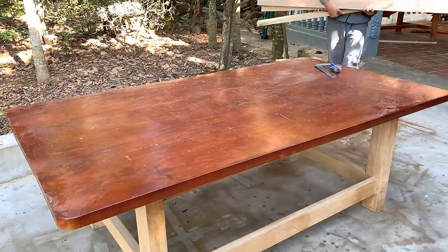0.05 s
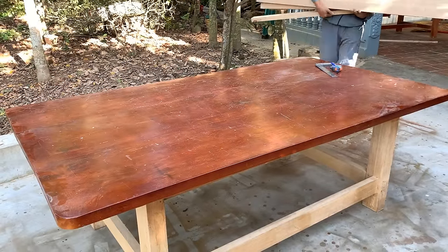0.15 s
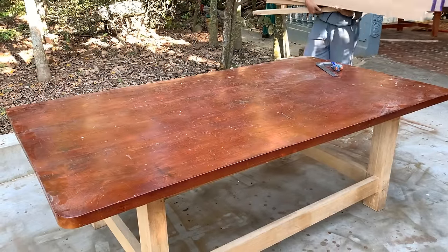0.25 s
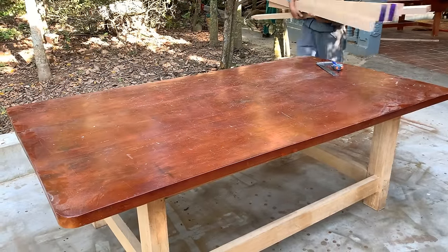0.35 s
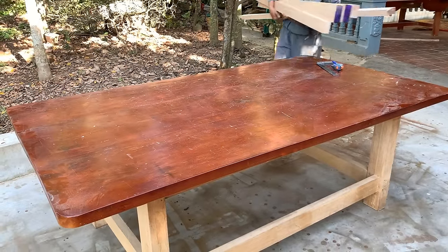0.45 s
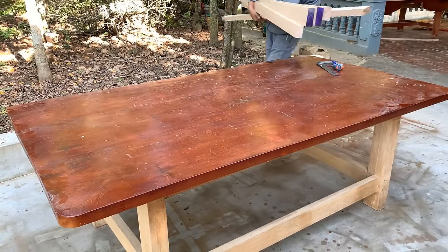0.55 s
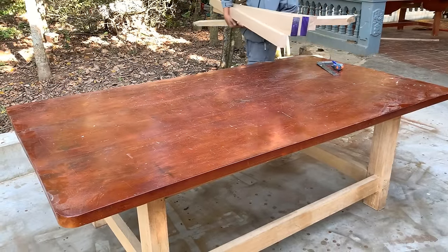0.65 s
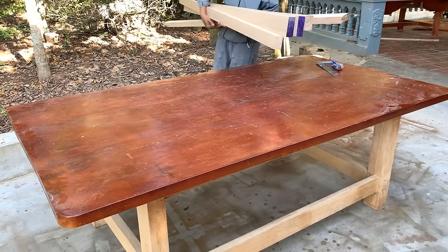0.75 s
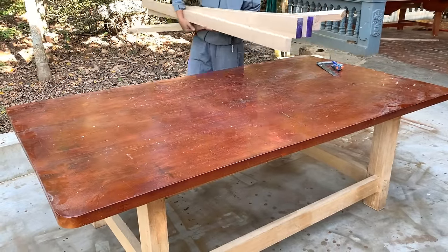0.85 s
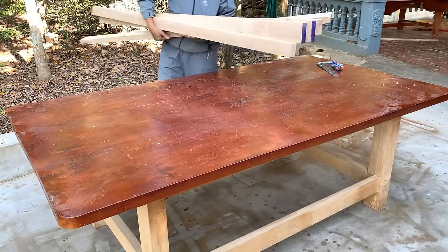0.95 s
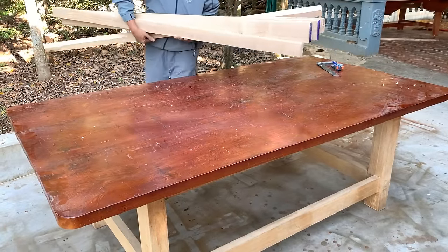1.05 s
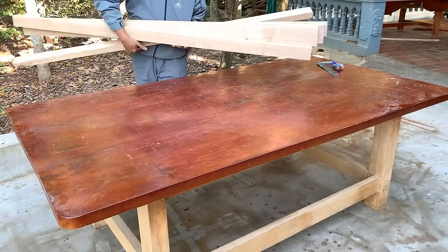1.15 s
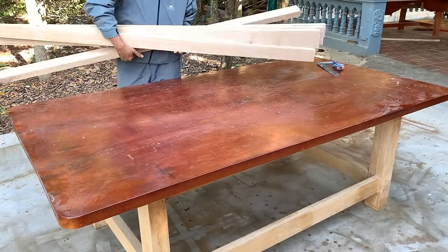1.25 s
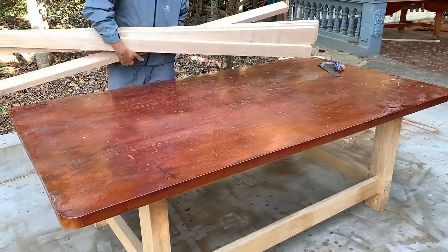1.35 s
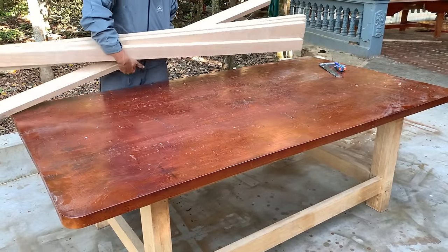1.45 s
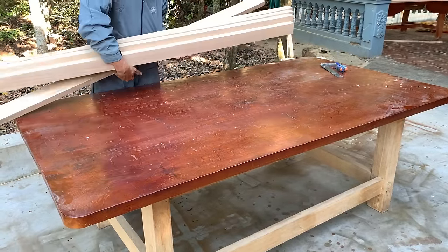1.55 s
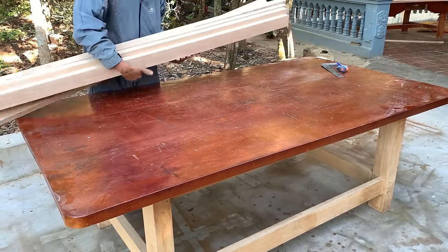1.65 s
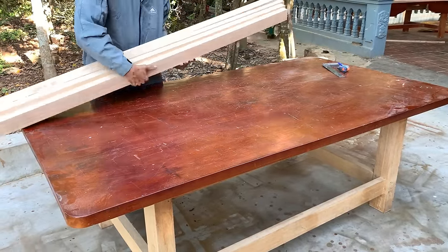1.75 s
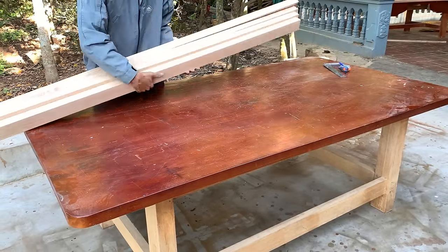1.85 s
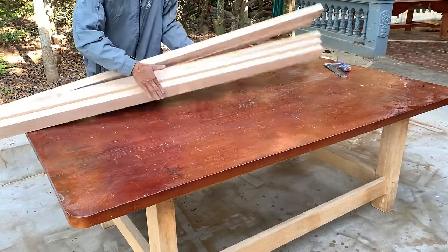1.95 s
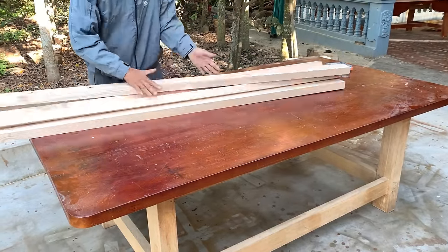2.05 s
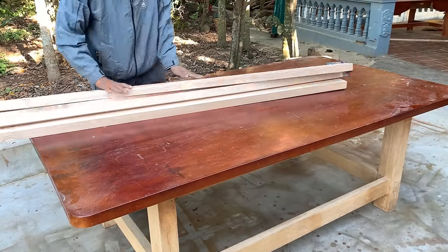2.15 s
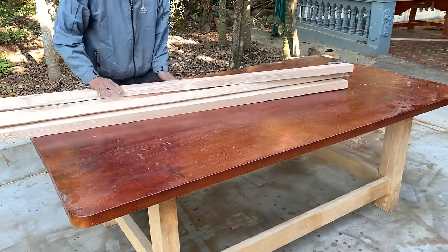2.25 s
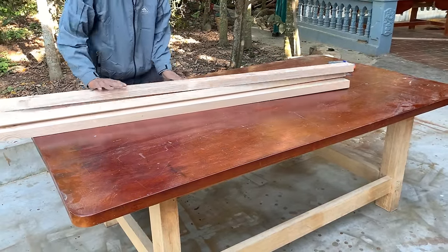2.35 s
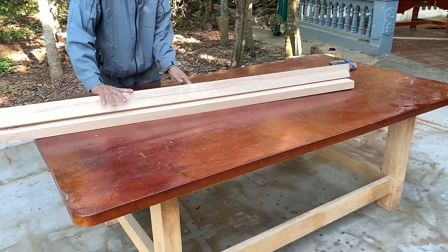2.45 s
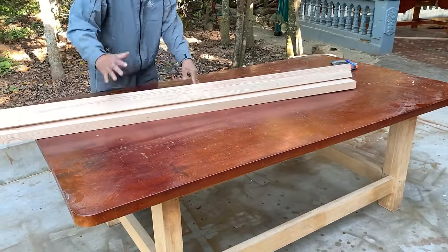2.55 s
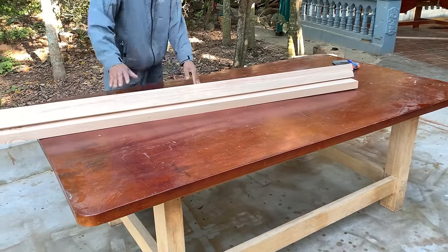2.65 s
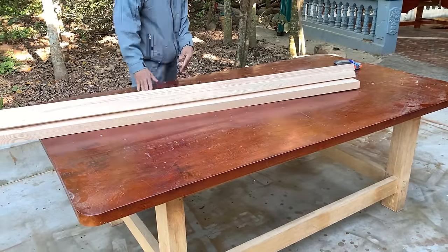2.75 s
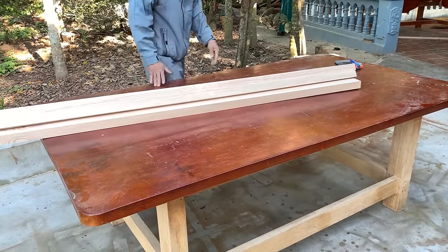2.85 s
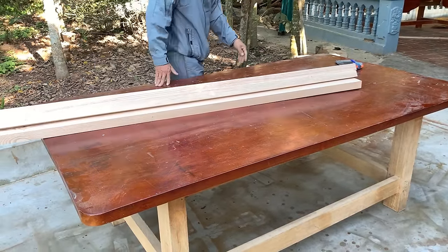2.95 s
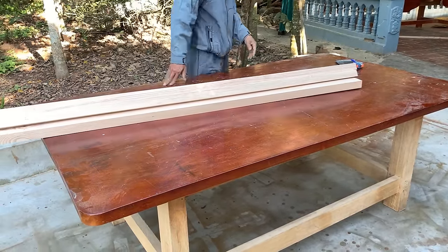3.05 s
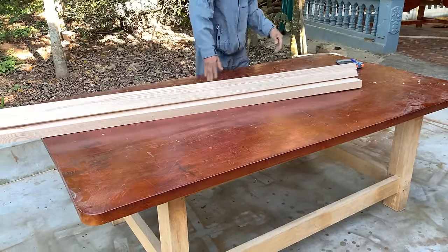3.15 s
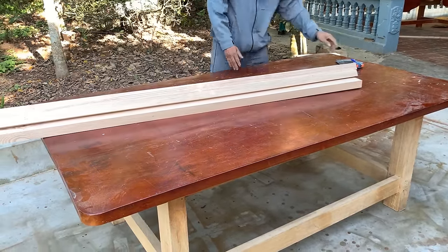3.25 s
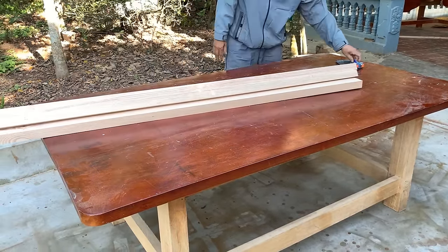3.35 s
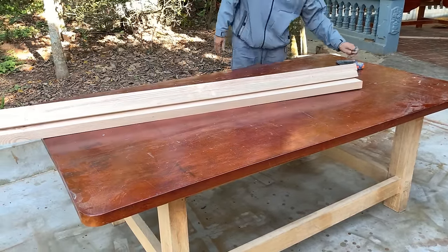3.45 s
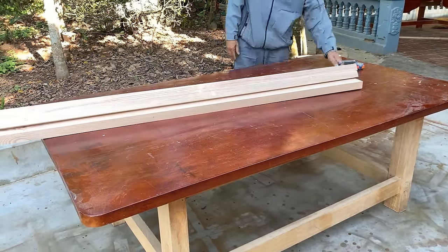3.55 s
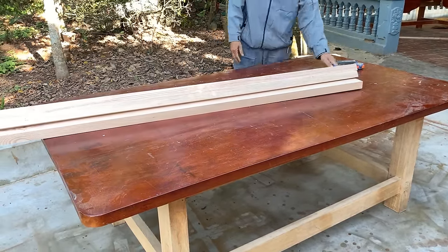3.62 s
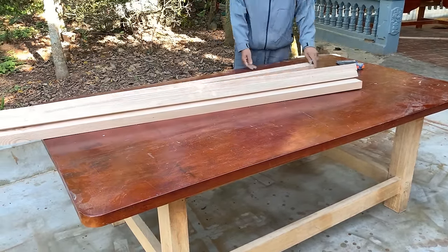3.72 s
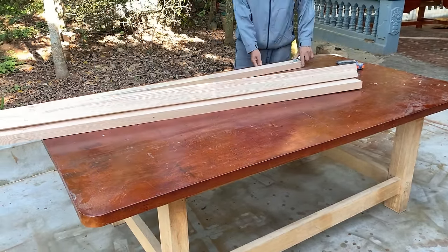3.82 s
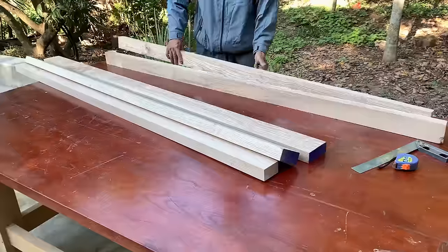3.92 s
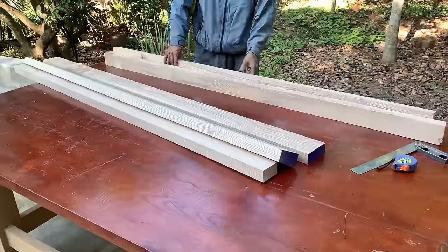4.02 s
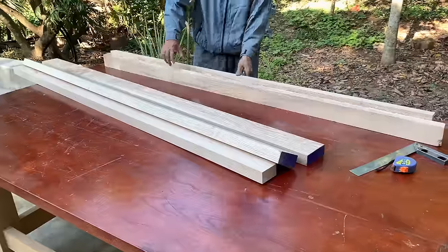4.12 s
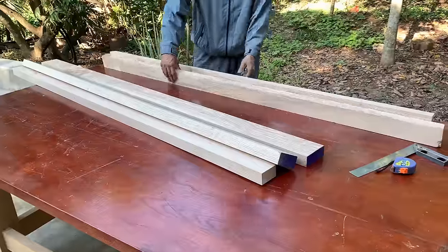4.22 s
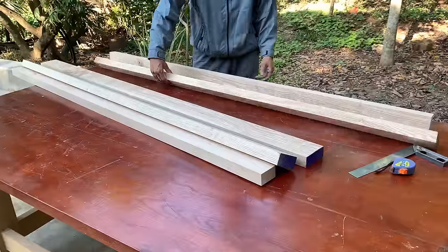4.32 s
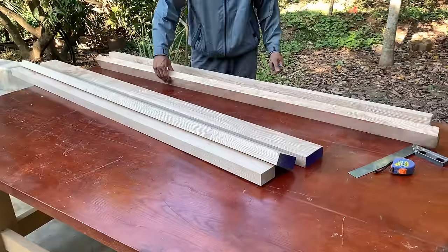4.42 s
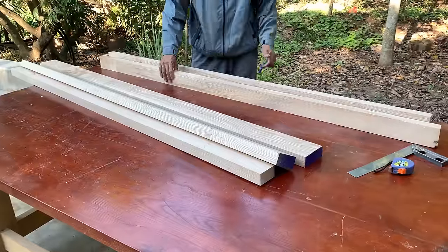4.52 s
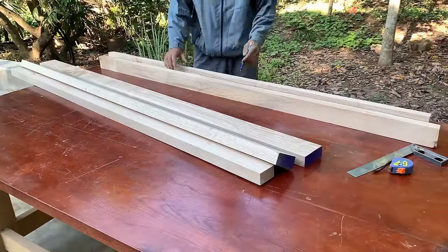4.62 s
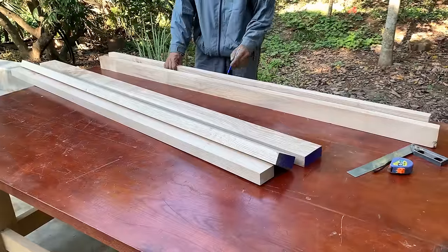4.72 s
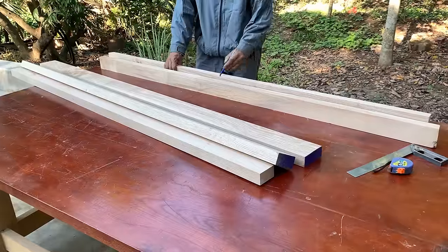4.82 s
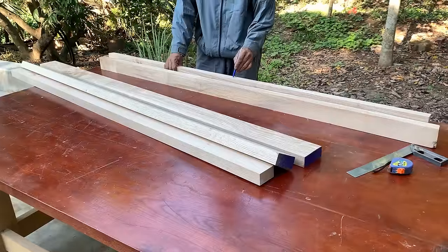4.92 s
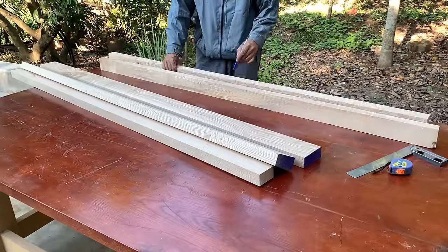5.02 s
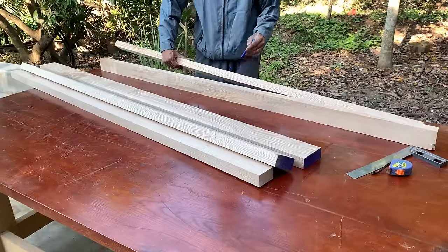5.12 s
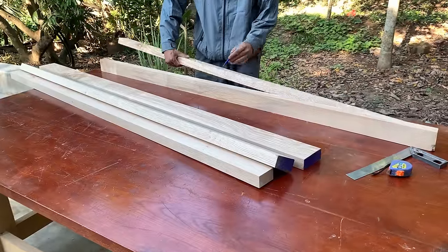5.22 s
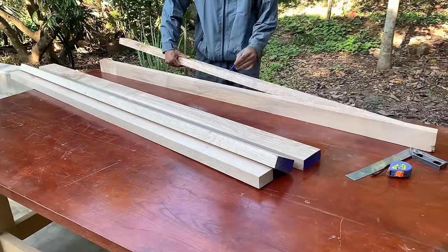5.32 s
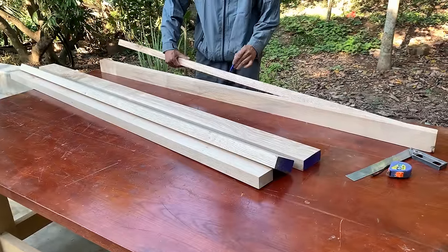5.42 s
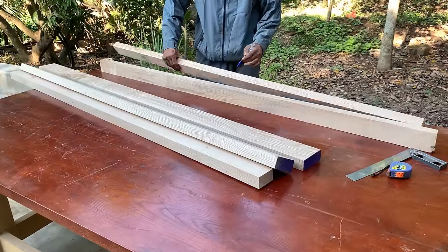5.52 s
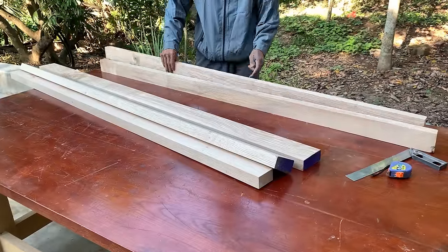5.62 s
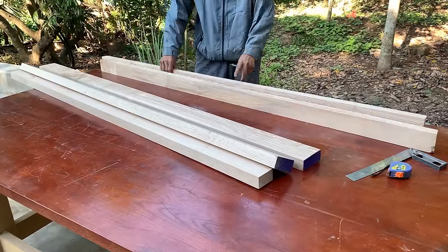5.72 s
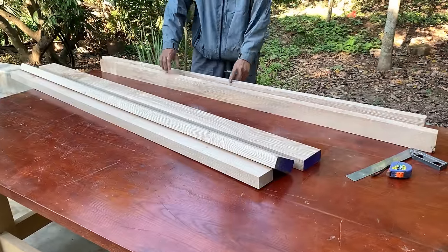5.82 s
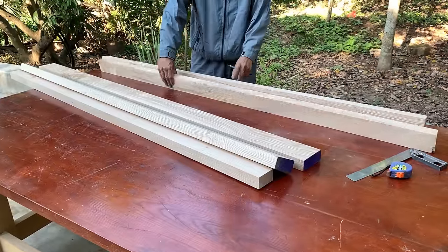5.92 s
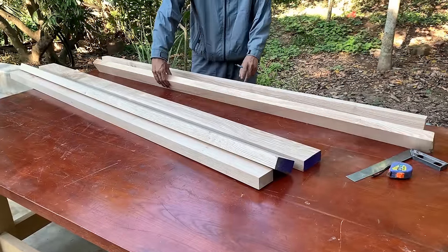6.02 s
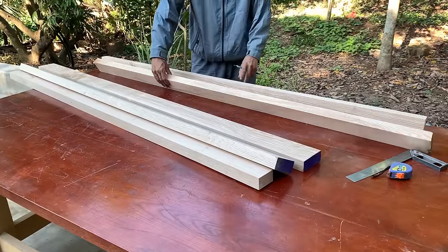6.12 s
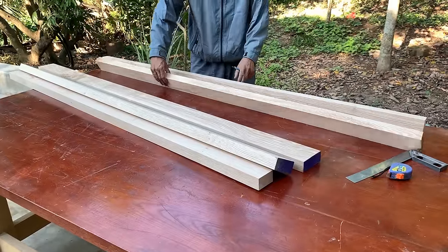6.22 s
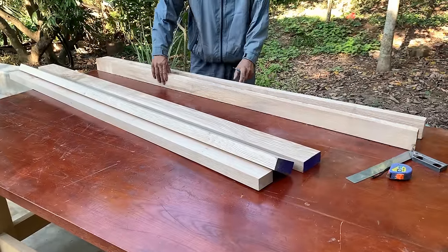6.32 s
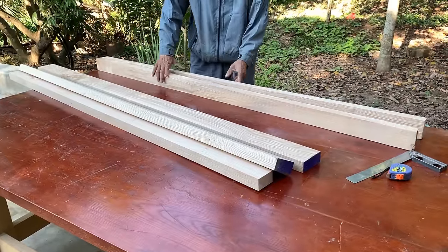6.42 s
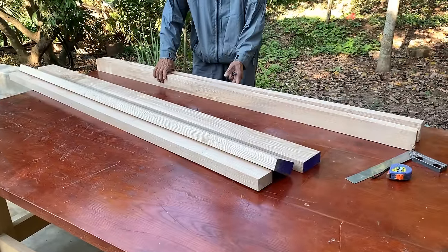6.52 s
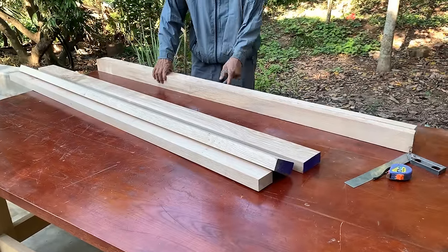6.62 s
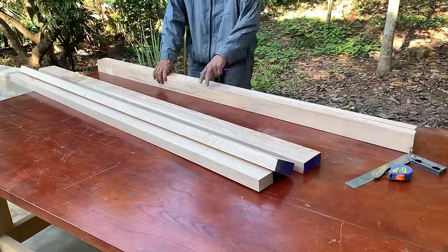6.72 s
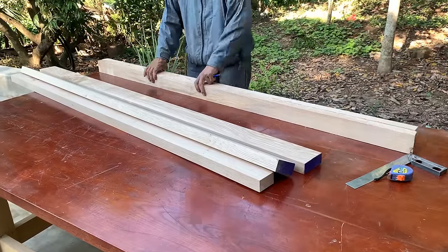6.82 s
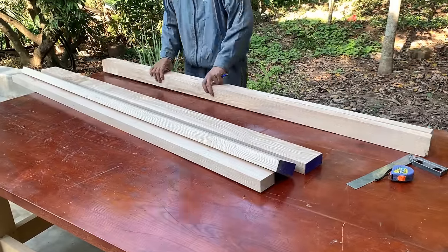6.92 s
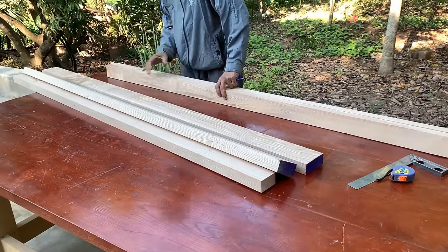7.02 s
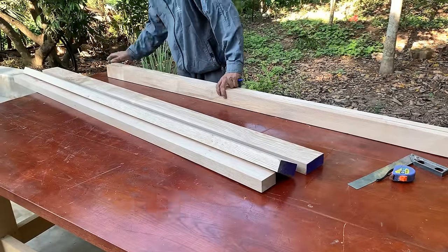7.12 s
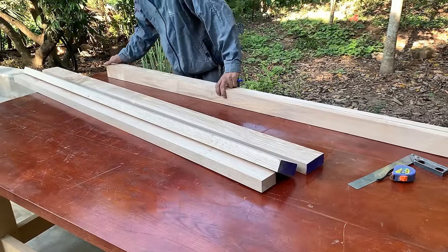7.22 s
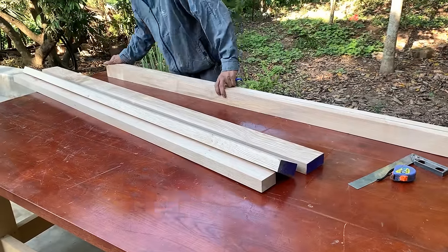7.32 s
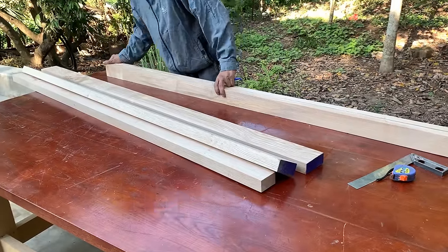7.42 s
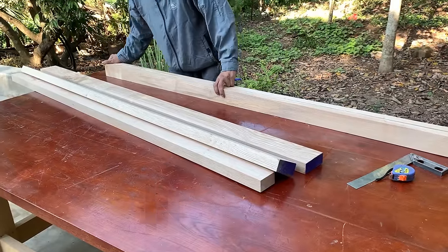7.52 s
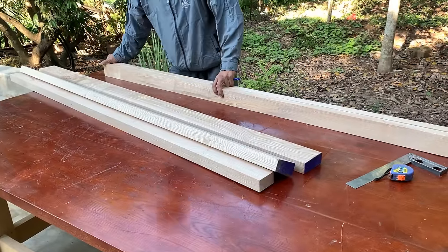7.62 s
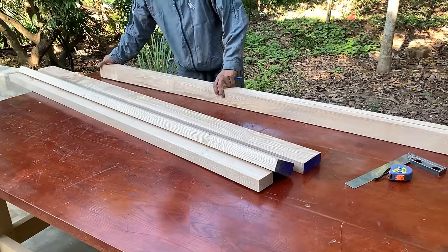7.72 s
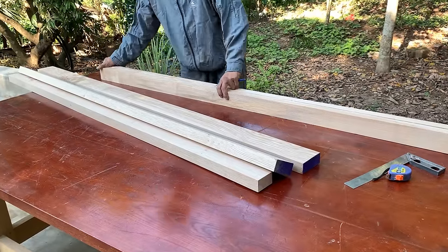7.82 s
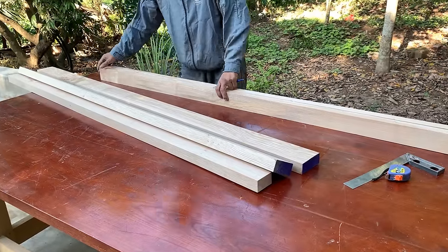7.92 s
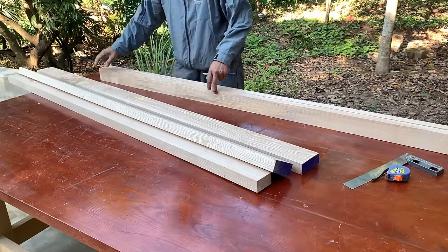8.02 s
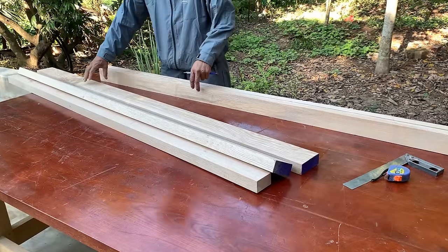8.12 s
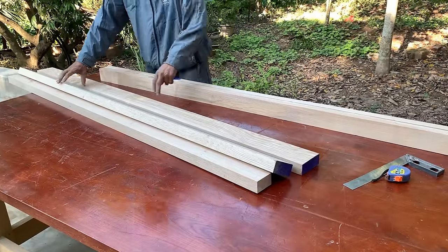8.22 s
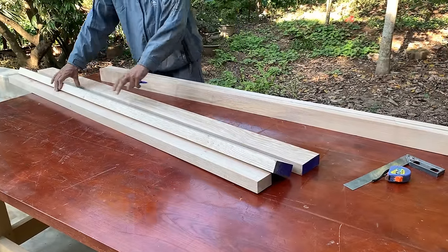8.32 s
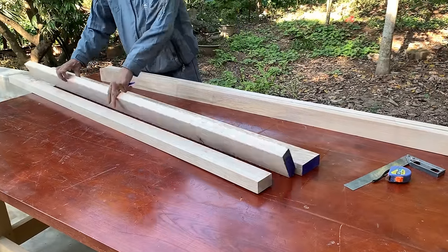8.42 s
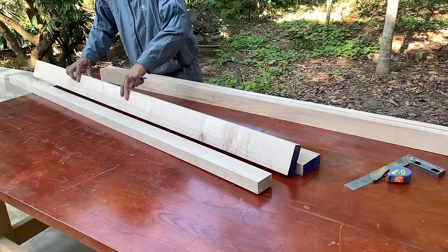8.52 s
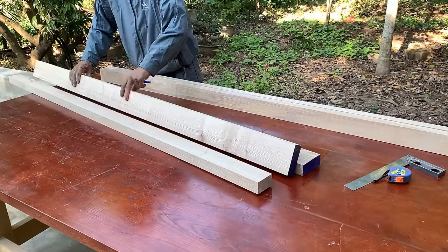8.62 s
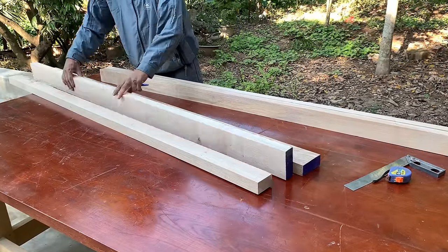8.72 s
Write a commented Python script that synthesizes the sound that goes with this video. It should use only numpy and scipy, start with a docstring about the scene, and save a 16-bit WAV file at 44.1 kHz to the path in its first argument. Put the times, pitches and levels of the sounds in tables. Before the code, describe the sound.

Carried planks thud, land in a bright wooden clatter, and are shifted with dry knocks, short slides and squeaks in an open yard.

```python
"""Long wooden boards clatter onto a heavy table in an open-air workshop, then slide and knock together. Each
knock is an irregular contact force driving a bending wave, named modes and a crowd of weaker modes. Friction
slides, scrapes, brushes, sings and squeaks as filtered noise; hard edges snap as short resonances. Carried
boards flex with thuds that sweep down in pitch; the loudest blows carry a brief low thump. Behind lie a low
hum, moving air, rustling, thin gliding chirps and an insect's ticking, all filtered noise or tones. The wood
and the chirps have a faint late echo; all sound breaks off once for an instant."""
import sys
import numpy as np
from scipy import signal
from scipy.fft import rfft, irfft, next_fast_len
from scipy.io import wavfile
from scipy.ndimage import uniform_filter1d, map_coordinates

SR = 44100
rng = np.random.default_rng(int(sys.argv[2]) if len(sys.argv) > 2 else 0)


def wav_out(sig):
    """Save sig, one row per channel (or a flat mono array), as 16-bit PCM at SR to the path in sys.argv[1]."""
    wavfile.write(sys.argv[1], SR, np.round(np.clip(np.atleast_2d(sig).T, -1, 1) * 32767).astype(np.int16))


N = 386316

# Surroundings, whose level sinks for about a second in the middle: start_s, hum_db, air_db
HUM_AND_AIR = [(0, -54, -66), (2.55, -62.5, -66.5), (2.75, -74, -87.5), (3.58, -71.5, -77.5),
               (3.91, -65, -63), (3.93, -56.5, -63.5), (5.5, -54, -59), (8.76, -55.5, -60.5)]
# Relative spectrum of the low hum: frequency_hz, density_db (per Hz)
HUM_COLOUR = [(25, -33), (60, -22.5), (90, -10), (115, 3.5), (175, 0.5), (230, -6.5), (330, -22.5),
              (600, -45.5), (12000, -75)]
# Relative spectrum of the moving air: frequency_hz, density_db (per Hz)
AIR_COLOUR = [(150, -17.5), (300, 10), (700, 2), (1150, 1.5), (1500, -15), (2500, -39), (14000, -62)]
# Relative spectrum of clothes and leaves: frequency_hz, density_db (per Hz)
RUSTLE_COLOUR = [(800, -21.5), (1500, 4), (2200, 0.5), (3500, -6), (5000, -11.5), (7000, -14),
                 (10500, -15.5), (14000, -28.5)]
# Broad movements that rustle clothes: centre_s, half_length_s, level_db
MOVEMENTS = [(0, 0.28, -63), (1.35, 1.23, -64.5), (5.6, 2.1, -69), (8.7, 3.9, -74.5)]
LEAVES_DB = -77  # mean level of the rustle beneath the movements

# Thin bird whistles: start_s, length_s, start_hz, end_hz, rasp_hz (random pitch spread), level_db
WHISTLES = [(0.114, 0.037, 8200, 6700, 520, -61.5), (0.225, 0.041, 7500, 6700, 420, -62.5),
            (3.951, 0.14, 7880, 7700, 259, -75.5), (7.5, 0.17, 10000, 8670, 150, -75),
            (7.712, .13, 10200, 9460, 151.4, -68.5), (7.91, 0.67, 10680, 10450, 90.6, -73)]
# Swelling and fading of an insect's ticking: centre_s, half_length_s, level_db
INSECT_SWELL = [(6.4, 1.85, -64.5)]
# Relative spectrum of the ticking: frequency_hz, density_db (per Hz)
INSECT_COLOUR = [(5500, -19.5), (7000, 0), (8800, 15.5), (10300, -7.5), (11700, -6), (13000, -29)]
INSECT_GAP_S, INSECT_RASP_S = .109, .045

# Relative spectrum of the echo from roof and walls: frequency_hz, density_db (per Hz)
YARD_COLOUR = [(80, -4), (200, -5), (1000, -5.5), (4000, -0.5), (12000, 5)]
# Decay of that echo: frequency_hz, t60_s
YARD_T60 = [(100, .6), (500, 1), (2000, 0.63), (5000, 0.26), (12000, 0.11)]
YARD_DB = -30  # echo of the wood

# Loudest blows with a brief low thump beneath them: start_s, level_db (before the gain and decay of the thump)
THUMPS = [(2.049, -18.5), (5.763, -48.5), (7.052, -22.5), (8.517, -24)]
# Bending waves in carried boards: start_s, level_db, sweep_s
FLEXES = [(0.139, -26, 0.0034), (0.353, -41.5, 0.0059), (1.072, -25, 0.0025), (5.309, -38.5, 0.0053)]

# Hands, sleeves and edges brushing wood: centre_s, half_length_s, level_db
BRUSHES = [(.165, .006, -54.5), (.453, .0045, -43.5), (1.197, 0.0081, -51), (3.28, 0.012, -66.5),
           (3.44, .04, -65.5), (3.78, 0.1, -64.5), (4.185, 0.0052, -48.5), (4.266, 0.0038, -44),
           (4.691, 0.0042, -48.5), (5.19, 0.086, -56.5), (5.494, .022, -56.5), (6.838, 0.015, -55),
           (7.674, .064, -56)]
# Relative spectrum of a brush: frequency_hz, density_db (per Hz)
BRUSH_COLOUR = [(200, 1), (700, 8.5), (2200, -3), (4000, -9), (7000, -12), (10000, -11), (15000, -31)]
# Sawn faces grinding over each other: start_s, length_s (before the release), level_db
SCRAPES = [(1.483, 0.0063, -42.5), (1.528, .08, -52), (1.668, 0.069, -49), (1.776, .073, -45),
           (1.85, .18, -53.5), (2.042, 0.0099, -21), (2.08, 0.025, -40), (2.165, 0.036, -51),
           (2.387, 0.047, -48.5), (2.47, 0.0097, -56), (5.02, 0.008, -47), (8.135, 0.012, -52.5)]
# Relative spectrum of a scrape: frequency_hz, density_db (per Hz)
SCRAPE_COLOUR = [(400, -13), (1300, -1), (2300, 3), (3200, -3.5), (5500, -11.5), (8500, -16.5),
                 (15000, -27)]
# Boards pushed along: start_s, length_s (before the release), level_db
SLIDES = [(.71, 0.12, -57), (1.55, 0.46, -51), (1.98, 0.11, -39), (2.045, 0.089, -31.5), (2.33, 0.2, -49),
          (5.757, .012, -31), (5.85, 0.031, -46), (6.325, 0.068, -53), (6.575, 0.094, -38),
          (6.97, 0.19, -47)]
# Relative spectrum of a sliding board: frequency_hz, density_db (per Hz)
SLIDE_COLOUR = [(100, -12), (300, 4.5), (700, 5), (1300, -3), (2300, -8), (4000, -12.5), (7000, -19),
                (15000, -31)]
PUSH_ATTACK_S, PUSH_RELEASE_S = 0.007, 0.022  # exponential time constants

# Light, smooth rubs: start_s, length_s (before the release), pitch_ratio, widening_ratio, level_db
RUBS = [(4.854, 0.2, 0.95, 2.8, -54), (5.023, 0.068, 1.03, 1.1, -49.5), (5.252, 0.27, 0.96, 1.35, -55.5),
        (8.05, 0.07, 0.96, 1.5, -47.5), (8.292, 0.14, .98, 2.6, -46.5), (8.579, 0.11, 0.91, 2.2, -55)]
# Resonances of a rub, before its pitch and widening ratios: pitch_hz, width_hz, level_db
RUB_MODES = [(1111, 106, 5.5), (1859, 110, -5), (2380, 230, -10.5), (3760, 520, -18)]
# Dry faces slipping over each other: centre_s, half_length_s, pitch_hz, level_db
SQUEAKS = [(1.809, .007, 2301, -32), (1.846, .007, 2400, -27.5), (1.919, .009, 2274, -39.5),
           (8.546, 0.013, 1890, -18)]

# Hard edges snapping together: start_s, pitch_hz, peak_db
CRACKS = [(1.531, 3470, -37), (1.744, 3100, -30), (1.977, 3840, -15.5), (2.0726, 3488, -10),
          (2.1153, 4120, -25), (6.631, 4600, -23), (6.653, 3560, -25)]
# Wood meeting wood: main_touch_s, chatter_s, level_db, hardness_hz, boom_db (table against the level)
BLOWS = [(.76, 0.017, -53, 1140, 4.5), (.985, 0.0014, -54.5, 4130, -4), (1.529, 0.0023, -27, 770, -6),
         (1.557, 0.015, -39, 950, -4), (1.591, .008, -41.5, 900, 1.5), (1.805, 0.0014, -40.5, 3420, -1),
         (1.839, 0.0021, -30, 1820, 8.5), (1.977, 0.0082, -34, 4470, 2), (2.049, 0.0079, -22.5, 7200, -11),
         (2.063, .0052, -26, 1210, -15.5), (2.09, .0018, -33, 5860, -5), (2.115, 0.0014, -35.5, 5400, -8),
         (2.157, 0.0025, -30, 2500, -22), (2.169, 0.0096, -32, 5144, -15), (2.201, 0.015, -36, 2870, -12),
         (2.387, 0.0082, -35.5, 2860, -13.5), (2.409, 0.0046, -35.5, 5350, -12.5),
         (2.474, 0.0091, -38, 2700, -6), (2.491, 0.0021, -40.5, 2405, -10), (2.578, 0.0078, -41, 3220, -8),
         (2.63, 0.017, -48.5, 1102, -7.5), (3.93, 0.0017, -45.5, 894, -10), (4.107, 0.0032, -22, 2020, -16),
         (4.119, 0.003, -26, 1515, -14.5), (4.267, 0.0078, -45.5, 1100, -4),
         (4.342, 0.0055, -22.5, 1850, -24), (4.571, 0.0021, -25, 1012, -21.5),
         (4.6, 0.0032, -33, 894, -16.5), (4.639, .003, -39.5, 833, -10), (4.692, .006, -45, 703, -8.5),
         (5.133, 0.022, -30, 1100, -13), (5.155, 0.026, -27, 1200, -15), (5.185, 0.02, -31.5, 1400, -14.5),
         (5.225, 0.019, -35, 550, -15), (5.764, 0.0013, -23, 4990, -14.5), (5.973, 0.0078, -48, 890, 1.5),
         (6.04, 0.0031, -28, 850, -18.5), (6.24, 0.0064, -29, 1496, -16.5),
         (6.382, 0.0034, -25.5, 1410, -17), (6.439, 0.029, -45.5, 600, -8), (6.632, 0.006, -25.5, 792, -17),
         (6.632, 0.0012, -40.5, 9000, -18), (6.652, 0.0083, -27, 1406, -15),
         (7.051, 0.0015, -19.5, 3200, -23.5), (7.208, 0.0026, -39, 1100, -22.5),
         (7.267, 0.0069, -49, 696, -8), (7.739, 0.013, -45, 703, -4), (7.808, 0.0028, -35, 1090, -16),
         (8.022, 0.007, -37.5, 848, -13), (8.426, 0.0082, -21, 1883, -11.5),
         (8.452, 0.0057, -28.5, 900, -20), (8.477, .004, -38.5, 2600, -9), (8.499, 0.01, -22.5, 1960, -5.5),
         (8.521, 0.0053, -16.5, 2400, -8.5), (8.545, 0.0062, -26, 2940, -19)]
# Limits of the five registers of a blow: edge_hz
BLOW_EDGES_HZ = [90, 300, 1000, 2600, 5500, 15000]
# Boom, body, clack, crack and tick of a perfectly hard blow: level_db (relative)
REGISTER_DB = [0, 0, 2, 0.5, 0.37]
CONTACT_ROLLOFF = 3.296  # 6 dB an octave for each unit, well above the hardness
GRAZE_S = .006  # the boards graze just before they land
RATTLES_PER_S, RATTLE_DB, RATTLE_S = 140, -10.5, 0.017  # sparse bounces; the last is their decay constant
# Relative spectrum of the crowd of weaker wood modes: frequency_hz, density_db (per Hz)
WOOD_COLOUR = [(70, -39), (130, -11.5), (300, 1), (650, 2), (1300, -4), (2000, -1.5), (3400, -9.5),
               (5000, -17.5), (7000, -27), (10000, -31), (15000, -53)]
# Decay of the crowd: frequency_hz, t60_s
WOOD_T60 = [(100, .7), (300, .085), (700, 0.12), (1500, 0.061), (3500, 0.056), (9000, .06)]
# Stacked boards ringing with the tabletop: pitch_hz, level_db (relative), t60_s
STACK_MODES = [(135, -3, 0.18), (200, 5, .15), (300, 0, 0.16), (333, -.5, 0.082), (372, 3, .097),
               (475, 2.5, 0.12), (542, 0, .15), (666, 3.5, .11), (781.4, 4, 0.064), (1400, -7, 0.055),
               (1906, -1.5, .06), (2579, -1, 0.047)]
# One board on the tabletop: pitch_hz, level_db (relative), t60_s
BOARD_MODES = [(229.2, -2.5, 0.19), (314.3, 0, 0.15), (419, 6, .1), (462.5, -1, 0.18), (528.7, 0, .078),
               (629, 6, 0.12), (717, -1, .1), (778, -4, 0.14), (878, 2.5, 0.1), (1167.4, 2.5, 0.11),
               (1294, -7.5, .07), (1498, -2, 0.076), (1787, 0.5, 0.07), (1902, -0.5, .06),
               (2480, -6.5, .07), (3470, -3.5, .05)]
STACK_UNTIL_S = 3
STACK_DB, BOARD_DB, DIRECT_DB = 1.5, -2.5, -5  # named modes and first wave, against the crowd

# Difference between the ears: frequency_hz, side_share (of power, limited to 0..1)
SPREAD = [(100, 0.054), (300, 0), (600, 0.04), (1000, 0.07), (2000, 0.38), (4000, 0.41), (12000, 1.32)]
# Colour of the two channels: frequency_hz, left_minus_right_db
BALANCE_DB = [(100, 0.1), (1000, -.5), (2000, -4), (4000, 0.5), (8000, 2), (14000, 3)]
LEFT_LAG_S, CUTOFF_HZ = .00002, 15800
# Instant of silence: start_s, end_s
SILENCE_S = (3.911, 3.928)


def from_db(db):
    """Decibel law: 20 dB is a tenfold amplitude."""
    return 10 ** (np.asarray(db) / 20)


def rms_one(x):
    """Normalisation by root mean square."""
    return x / np.sqrt(np.mean(x ** 2) + 1e-20)


def in_time(rows):
    """Linear interpolation of each column over time."""
    s, *columns = np.transpose(rows)
    return [np.interp(np.arange(N) / SR, s, column) for column in columns]


def at_hz(points, hz):
    """Interpolation on a logarithmic frequency axis."""
    f, value = np.transpose(points)
    return np.interp(np.log(np.maximum(hz, 1)), np.log(f), value)


def add(out, s, sound):
    """Superposition: a sound is summed in at time s."""
    i = max(round(s * SR), 0)
    out[..., i:i + sound.shape[-1]] += sound[..., :max(N - i, 0)]


def drift(rate, size=N):
    """Random modulation: normal values, rate of them a second, joined by straight lines."""
    knots = np.arange(size) / SR * rate
    return np.interp(knots, np.arange(9000), rng.standard_normal(9000))


def noise(spectrum, size=N):
    """Spectral shaping of stereo noise to rms 1, with interaural difference set by frequency."""
    fast = next_fast_len(size)
    hz = np.fft.rfftfreq(fast, 1 / SR)
    mid, side = rfft(rng.standard_normal((2, fast)))
    apart = np.clip(at_hz(SPREAD, hz), 0, 1)
    both = np.sqrt(1 - apart) * mid + np.sqrt(apart) * side * [[1], [-1]]
    coloured = both * from_db(at_hz(spectrum, hz))
    return rms_one(irfft(coloured, fast)[:, :size])


def dying_noise(spectrum, t60s, size, rise_cycles):
    """High modal density: each octave swells over a few cycles, then decays at its own rate."""
    t, hz = np.arange(size) / SR, np.fft.rfftfreq(size, 1 / SR)
    source, out = rfft(noise(spectrum, size=size)), 0
    centres = np.geomspace(110, 14080, 8)
    for centre, share in zip(centres, np.eye(len(centres))):
        band = irfft(source * at_hz(np.c_[centres, share], hz), size)
        rise = 1 - np.exp(-t * centre / rise_cycles)
        out = out + band * rise * from_db(-60 * t / at_hz(t60s, centre))
    return rms_one(out)


def swells(rows):
    """Raised-cosine envelopes: a smooth rise and fall around each moment."""
    level = np.zeros(N)
    for s, half_s, db in rows:
        away = np.clip((np.arange(N) / SR - s) / half_s, -1, 1)
        level += from_db(db) * (1 + np.cos(np.pi * away)) / 2
    return level


def push(length, db):
    """Exponential attack and release: a push gets going quickly, holds and dies away."""
    t = np.arange(SR) / SR
    attack = 1 - np.exp(-t / PUSH_ATTACK_S)
    release = np.exp(-np.maximum(t - length, 0) / PUSH_RELEASE_S)
    return from_db(db) * attack * release


def pushes(rows):
    """Superposition of push envelopes."""
    level = np.zeros(N)
    for s, length, db in rows:
        add(level, s, push(length, db))
    return level


def resonate(x, hz, width_hz):
    """Two-pole resonance, applied twice for steep skirts; rms 1."""
    r = np.exp(-np.pi * width_hz / SR)
    section = [1 - r, 0, r - 1, 1, -2 * r * np.cos(2 * np.pi * hz / SR), r * r]
    return rms_one(signal.sosfilt([section, section], x))


def no_bass(x, lowest_hz):
    """Radiation limit: narrow boards radiate no deep bass."""
    return signal.sosfilt(signal.butter(4, lowest_hz, "high", fs=SR, output="sos"), x)


def yard(x, echo_db):
    """Reverberation: a late echo from roof and walls is convolved with the source."""
    echo = dying_noise(YARD_COLOUR, YARD_T60, size=32768, rise_cycles=5.4)
    echo = echo / np.sqrt(np.sum(echo ** 2) / 2)  # unit energy
    echo = np.pad(echo, ((0, 0), (round(.018 * SR), 0)))
    return from_db(echo_db) * signal.fftconvolve(x, echo, axes=1)[:, :N]


def surroundings():
    """Amplitude-modulated noise: a wavering hum, moving air, and rustling clothes and leaves."""
    waver_db, gust_db, flicker_db = 1.8 * drift(14), 2 * drift(18), 2.8 * drift(25)
    hum_db, air_db = in_time(HUM_AND_AIR)
    hum = from_db(hum_db + waver_db) * noise(HUM_COLOUR)
    air = from_db(air_db + gust_db) * noise(AIR_COLOUR)
    rustle_level = from_db(LEAVES_DB) + swells(MOVEMENTS)
    rustle = rustle_level * from_db(flicker_db) * noise(RUSTLE_COLOUR)
    return hum + air + rustle


def birds(waver_hz, echo_db):
    """Frequency modulation: thin falling tones waver, rasp and flutter, blurred by their echoes."""
    out, waver, flutter = np.zeros(N), waver_hz * drift(45), from_db(3.6 * drift(90))
    for s, length, start_hz, end_hz, rasp_hz, db in WHISTLES:
        size = int(length * SR)
        glide = np.linspace(start_hz, end_hz, size)
        hz = glide + waver[int(s * SR):][:size] + rasp_hz * drift(900, size=size)
        tone = np.sin(2 * np.pi * np.cumsum(hz) / SR)
        add(out, s, from_db(db) * np.hanning(size) ** .5 * tone)
    song = (out * flutter)[None]
    return song + yard(song, echo_db)


def insect(gap_s, rasp_s):
    """Gated noise: faint high rasps of uneven strength come at an unsteady pace."""
    gate = np.zeros(N)
    for k, (late, db) in enumerate(rng.standard_normal((100, 2))):
        rasp = from_db(2.5 * db) * np.hanning(int(rasp_s * SR))
        add(gate, gap_s * (k + .08 * late), rasp)
    return swells(INSECT_SWELL) * gate * noise(INSECT_COLOUR)


def thumps(thump_hz, decay_s):
    """Decaying sine: a brief low thump beneath the loudest blows dies within a fraction of a cycle."""
    out, t = np.zeros(N), np.arange(SR // 5) / SR
    for s, db in THUMPS:
        add(out, s, from_db(db + 7.0) * np.sin(2 * np.pi * thump_hz * t) * np.exp(-t / decay_s))
    return out


def flexes(top_hz, swell):
    """Bending-wave dispersion: highs arrive first along a thin board, so the thud sweeps down."""
    out, t = np.zeros(N), np.arange(SR // 12) / SR
    for s, db, sweep_s in FLEXES:
        age = t / sweep_s  # in sweep times, as is swell
        cycles = top_hz * sweep_s * age / (1 + age)
        shape = (0.071 + (age / swell) ** 2) * np.exp(1 - (age / swell) ** 2)
        # the pitch falls towards 60 Hz
        add(out, s, from_db(db) * shape * np.sin(2 * np.pi * (cycles + 60 * t)))
    return out


def brushes(grain_db):
    """Light friction: short dry swishes, uneven with the grain of the wood."""
    return swells(BRUSHES) * from_db(grain_db * drift(400)) * noise(BRUSH_COLOUR)


def scrapes(grain_db, uneven_db):
    """Rough friction: saw marks rasp as dense, bright grit that surges with the pressure."""
    grit_db = grain_db * drift(800) + uneven_db * drift(70)
    return pushes(SCRAPES) * from_db(grit_db) * noise(SCRAPE_COLOUR)


def slides(catches_per_s, grain_db, smooth_share, uneven_db):
    """Stick and slip: fibres catch and let go at random, shaking the boards as they slide."""
    sizes = from_db(grain_db * np.minimum(rng.exponential(1, N), 4)) * rng.choice([-1, 1], N)
    catches = rms_one(sizes * (rng.random(N) < catches_per_s / SR))
    friction = catches + smooth_share * rng.standard_normal(N)
    slide_t60 = [(200, 0.081), (1500, 0.025), (8000, 0.0035)]  # frequency_hz, t60_s
    body = dying_noise(SLIDE_COLOUR, slide_t60, size=8192, rise_cycles=0.91)
    body = body / np.sqrt(np.sum(body ** 2) / 2)  # unit energy
    speed = pushes(SLIDES) * from_db(uneven_db * drift(70))
    return signal.fftconvolve((friction * speed)[None], body, axes=1)[:, :N]


def rubs(rise_share, rise_s, waver_share, broken_db):
    """Friction-driven resonance: tones rise as the stroke speeds up; each wavers and breaks up alone."""
    out, t = np.zeros(N), np.arange(SR) / SR
    for s, length, pitch, blur, db in RUBS:
        song = 0
        for hz, width_hz, mode_db in RUB_MODES:
            speed = pitch * (1 - rise_share * np.exp(-t / rise_s) + waver_share * drift(45, size=SR))
            steady = resonate(rng.standard_normal(SR), hz, blur * width_hz)
            # reading the tone at a varying speed bends its pitch
            tone = map_coordinates(steady, [np.cumsum(speed)], order=1, mode="wrap")
            song = song + tone * from_db(mode_db + broken_db * drift(110, size=SR))
        add(out, s, rms_one(song) * push(length, db))
    return out


def squeaks(width_share):
    """Stick and slip: quick, unsteady motion, as resonant noise, gathers around one pitch."""
    out = np.zeros(N)
    for s, half_s, hz, db in SQUEAKS:
        size = int(2 * half_s * SR)
        tone = resonate(rng.standard_normal(size), hz, width_share * hz)
        add(out, s - half_s, from_db(db) * np.hanning(size) * tone)
    return out


def cracks(decay_s, width_share):
    """Local impact: a hard corner rings very briefly, high above the body of the board."""
    out, t = np.zeros(N), np.arange(SR // 30) / SR
    for s, hz, db in CRACKS:
        burst = rng.standard_normal(len(t)) * np.exp(-t / decay_s)
        snap = resonate(burst, hz, width_share * hz)
        add(out, s, from_db(db) * snap / abs(snap).max())
    return out


def contact(chatter_s, touches_per_s, touch_size, graze_size, size=4096):
    """Multiple impact: a graze, the main touch, lesser ones as the faces close, and a dying rattle."""
    main = round(GRAZE_S * SR)
    t = (np.arange(size) - main) / SR
    graze = graze_size * (1 + t / GRAZE_S) ** 2
    closing = touch_size * np.exp(-abs(t) / max(chatter_s, 1e-4))
    pressure = np.where(t < 0, graze, closing)
    force = (rng.random(size) < touches_per_s / SR) * rng.standard_normal(size) * pressure
    bounces = (t > 0) * (rng.random(size) < RATTLES_PER_S / SR) * rng.choice([-1, 1], size)
    force = force + bounces * from_db(RATTLE_DB) * np.exp(-abs(t) / RATTLE_S)
    force[main] = 1
    return force


def wood_ring(modes, modes_db, size, grip_share, scatter_db, ear_rad, travel):
    """Modal superposition: a dispersed bending wave, then modes weighted by the place of contact."""
    t = np.arange(size) / SR
    hz, db, t60 = np.transpose(modes)[:, :, None]
    hz = hz * (1 + grip_share * rng.standard_normal(hz.shape))  # grip and support shift each mode
    signs = rng.choice([-1, 1], hz.shape)
    strength = from_db(db + scatter_db * rng.standard_normal(hz.shape)) * signs
    age = np.maximum(t - travel / np.sqrt(hz), 0)  # low bending waves travel slowest
    rings = strength * from_db(-60 * age / t60) * np.sin(2 * np.pi * hz * age)
    # each mode differs in strength between the ears
    ears = 1 + ear_rad * np.sqrt(hz / 1000).T * rng.standard_normal(len(hz)) * [[1], [-1]]
    f = np.fft.rfftfreq(size, 1 / SR)
    delay = np.exp(-4j * np.pi * travel * np.sqrt(f))
    first = irfft(from_db(at_hz(WOOD_COLOUR, f)) * f / (f + 1200) * delay, size)
    crowd = dying_noise(WOOD_COLOUR, WOOD_T60, size=size, rise_cycles=2.0)
    return from_db(DIRECT_DB) * rms_one(first) + from_db(modes_db) * rms_one(ears @ rings) + crowd


def registers(db, hardness_hz, boom_db):
    """Contact stiffness: a soft contact drives the modes above its hardness only weakly."""
    edges = np.array(BLOW_EDGES_HZ)
    loss_db = 10 * CONTACT_ROLLOFF * np.log10(1 + edges[1:] * edges[:-1] / hardness_hz ** 2)
    levels_db = db + np.array(REGISTER_DB) - (loss_db - loss_db[1])  # against the body register
    levels_db[0] = db + REGISTER_DB[0] + boom_db
    return levels_db


def voiced(sound, levels_db):
    """Minimum-phase filtering brings each register of the attack towards its level."""
    size, attack = sound.shape[-1], round(.036 * SR)
    hz, edges = abs(np.fft.fftfreq(size, 1 / SR)), np.array(BLOW_EDGES_HZ)
    centres = np.sqrt(edges[1:] * edges[:-1])
    fade = np.minimum(1, np.linspace(6, 0, attack))
    for _ in range(2):  # the second pass refines the first
        power = abs(np.fft.fft(sound.mean(0)[:attack] * fade, size)) ** 2 / (size * attack)
        bands = [power[(hz >= lo) & (hz < hi)].sum() for lo, hi in zip(edges, edges[1:])]
        now_db = 10 * np.log10(np.array(bands) + 1e-20)
        gain = from_db(at_hz(np.c_[centres, levels_db - now_db], hz))
        causal = np.exp(np.conj(signal.hilbert(np.log(gain))))
        sound = np.fft.ifft(np.fft.fft(sound) * causal).real
    return sound


def knocks(lowest_hz, size=16384):
    """Forced vibration: each blow's contact drives first the whole stack, later single boards."""
    out = np.zeros((2, N))
    for s, chatter_s, db, hardness_hz, boom_db in BLOWS:
        modes, modes_db = (STACK_MODES, STACK_DB) if s < STACK_UNTIL_S else (BOARD_MODES, BOARD_DB)
        force = contact(chatter_s, touches_per_s=1300, touch_size=.62, graze_size=.25)
        ring = wood_ring(modes, modes_db, size=size, grip_share=.008, scatter_db=1.86,
                         ear_rad=0.1, travel=.07)  # travel in s times root Hz
        sound = signal.fftconvolve(ring, force[None], axes=1)[:, :size]
        add(out, s - GRAZE_S, voiced(sound, registers(db, hardness_hz, boom_db)))
    return no_bass(out, lowest_hz)


def scene():
    """Superposition of the surroundings, the low thuds and the woodwork with its echo."""
    background = surroundings() + birds(waver_hz=100, echo_db=-3) + insect(INSECT_GAP_S, INSECT_RASP_S)
    sub_thumps = thumps(thump_hz=45, decay_s=0.0011)
    low = sub_thumps + no_bass(flexes(top_hz=1645, swell=2.24), lowest_hz=90.5)
    friction = brushes(grain_db=5.5) + scrapes(grain_db=3.5, uneven_db=5.0)
    friction = friction + slides(catches_per_s=2200, grain_db=2.5, smooth_share=0.68, uneven_db=3.0)
    singing = rubs(rise_share=.13, rise_s=.018, waver_share=0.032, broken_db=3) + squeaks(width_share=0.1)
    wood = knocks(lowest_hz=104) + cracks(decay_s=0.0047, width_share=0.38) + friction + singing
    return background + low + wood + yard(wood, YARD_DB)


def dropout(x):
    """Gating: the sound breaks off for an instant, with short ramps at both ends."""
    t = np.arange(N) / SR
    sounding = 1.0 * ((t < SILENCE_S[0]) | (t > SILENCE_S[1]))
    return x * uniform_filter1d(sounding, size=64)


def record(dry):
    """Linear filtering and saturation: unequal channels, left later; peaks rounded, top cut."""
    size = next_fast_len(N + SR // 10)
    hz = np.fft.rfftfreq(size, 1 / SR)
    # half of the difference falls to each channel
    left = from_db(at_hz(BALANCE_DB, hz) / 2) * np.exp(-1j * np.pi * hz * LEFT_LAG_S)
    heard = irfft(rfft(dropout(dry), size) * np.array([left, 1 / left]), size)[:, :N]
    rounded = heard / (1 + (heard / .68) ** 6) ** (1 / 6)
    return signal.sosfilt(signal.ellip(10, .1, 80, CUTOFF_HZ, fs=SR, output="sos"), rounded)


dry = scene()
out = record(dry)
wav_out(out)
```